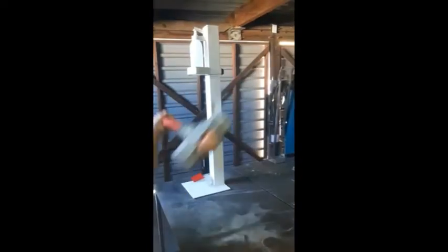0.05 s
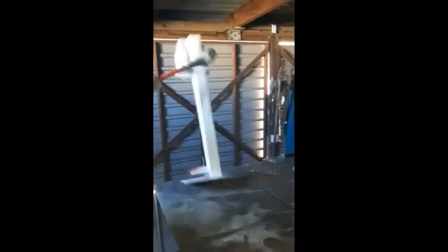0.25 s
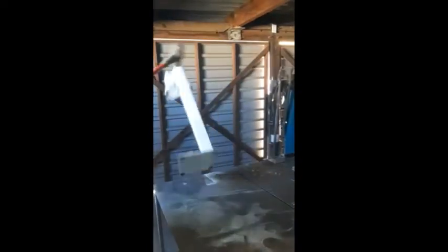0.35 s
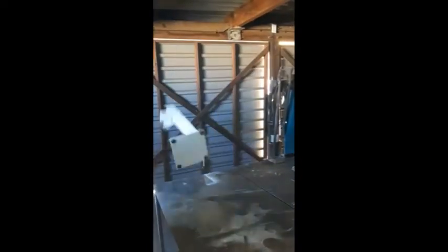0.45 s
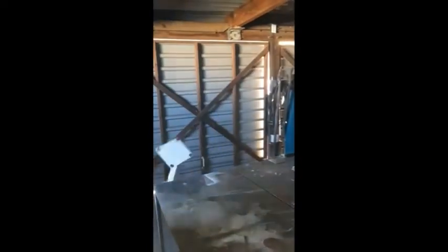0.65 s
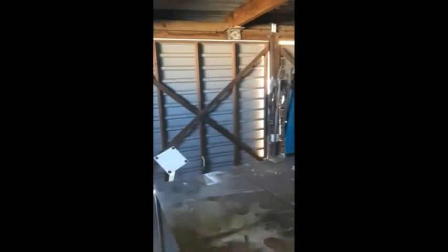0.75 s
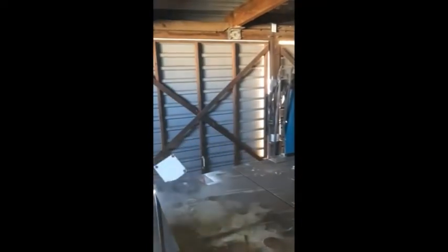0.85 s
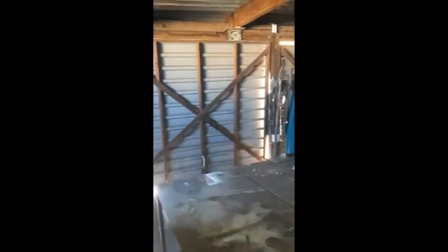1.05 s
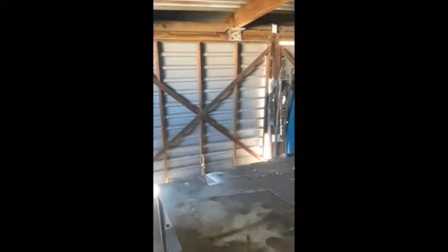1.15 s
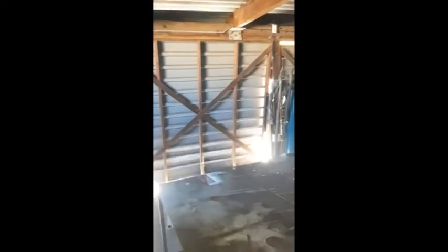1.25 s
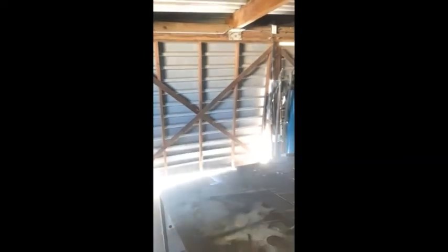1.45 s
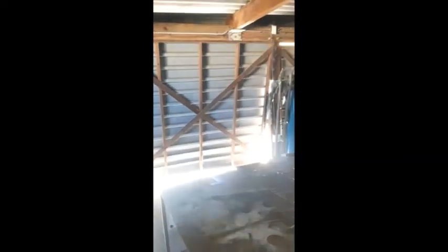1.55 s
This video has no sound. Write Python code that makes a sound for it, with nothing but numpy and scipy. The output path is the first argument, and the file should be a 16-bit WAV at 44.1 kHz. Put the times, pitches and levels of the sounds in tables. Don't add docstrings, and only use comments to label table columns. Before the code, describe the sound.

A steel stand takes a sharp sledgehammer hit after a brief swish, rattles and rings, then slams down, bounces, skids and crashes again with clattering, close and flattened by the microphone in a bright, reverberant sheet-metal shed.

```python
import sys
import numpy as np
from scipy import signal
from scipy.fft import rfft, irfft, next_fast_len
from scipy.io import wavfile
from scipy.ndimage import uniform_filter1d, minimum_filter1d

SR = 44100
rng = np.random.default_rng(int(sys.argv[2]) if len(sys.argv) > 2 else 0)


def natural_amplitude(level_db):
    exponent = np.asarray(level_db, float) / 20
    return 10 ** exponent


def store_wav(level_fs):
    pcm = np.round(np.clip(np.atleast_2d(level_fs), -1, 1) * 32767)
    wavfile.write(sys.argv[1], SR, pcm.T.astype(np.int16))


N = 70560


def at_hz(points, hz):
    table_hz, values = np.transpose(points)
    return np.interp(np.log(np.maximum(hz, 1)), np.log(table_hz), values)


def in_time(rows):
    return natural_amplitude(np.interp(np.arange(N) / SR, *np.transpose(rows)))


def shaped(x, gain_db):
    size = next_fast_len(N + 4096)
    gain = natural_amplitude(gain_db(np.fft.rfftfreq(size, 1 / SR)))
    return irfft(rfft(x, size) * gain, size)[..., :N]


def rms_one(x):
    return x / np.sqrt(np.mean(x ** 2) + 1e-20)


def low_cut(x, hz):
    return signal.sosfilt(signal.butter(2, hz, "high", fs=SR, output="sos"), x)


def later(x, lag_s):
    return np.interp(np.arange(N) - lag_s * SR, np.arange(N), x)


# (time [s], level [dB])
STIR_LEVEL = [
    (0, -36.5),
    (.04, -38),
    (.075, -41.5),
    (.6, -39),
    (1.6, -57.5),
]
# (frequency [Hz], level [dB])
AIR_COLOUR = [(40, 12), (150, -9.5), (500, -8.5), (1000, -10.5), (3000, -14), (6000, -15.5), (9000, -11.5),
              (15000, -25.5)]


def air():
    noise = shaped(rng.standard_normal((2, N)), lambda hz: at_hz(AIR_COLOUR, hz))
    return in_time(STIR_LEVEL) * rms_one(noise)


# (time [s], level [dB])
SWING_LEVEL = [
    (.082, -62),
    (.0895, -34.5),
    (.13, -30.5),
    (.165, -40.5),
    (.198, -34),
    (.21, -77),
]
# (time [s], level [dB])
WHISTLE_LEVEL = [
    (.085, -73),
    (.0885, -43),
    (.11, -42.5),
    (.125, -55),
    (.14, -79),
]


def swish():
    hiss_hz, hiss_width_hz, skirt_db = 5600, 1600, -2
    whistle_hz, whistle_width_hz = 4670, 190

    def hiss_colour(hz):
        band = np.exp(-((hz - hiss_hz) / hiss_width_hz) ** 2)
        skirt = natural_amplitude(2 * skirt_db) * np.minimum(hz / hiss_hz, 1)
        return 10 * np.log10(band + skirt)

    def whistle_colour(hz):
        return -9 * np.minimum(((hz - whistle_hz) / whistle_width_hz) ** 2, 9)

    whistle = rms_one(shaped(rng.standard_normal(N), whistle_colour))
    hiss = rms_one(shaped(rng.standard_normal((2, N)), hiss_colour))
    return in_time(WHISTLE_LEVEL) * whistle + in_time(SWING_LEVEL) * hiss


def ring(strikes, hz, t60):
    r, w = natural_amplitude(-60 / (t60 * SR)), 2 * np.pi * hz / SR
    return signal.lfilter([0, np.sin(w)], [1, -2 * r * np.cos(w), r * r], strikes)


# (time [s], frequency [Hz], level [dB], t60 [s])
PING_NOTES = [(.09, 4650, -42, .12), (.222, 1990, -4, .2), (.295, 1257, -12.5, .12), (.38, 1400, -13, 0.11),
              (.53, 522, -33.5, 0.36), (0.599, 1440, -43.5, 0.57), (.703, 633, -6, 0.094),
              (.722, 1398, -13, 0.12), (.745, 2030, -14, 0.12), (.755, 1770, -18, 0.073),
              (0.939, 513, -32, 0.14), (.98, 1034, -26.5, 0.18), (1.105, 1340, -10, 0.13),
              (1.13, 770, -23, 0.068), (1.14, 1500, -8, 0.103), (1.142, 1020, -19, 0.092),
              (1.14, 2180, -16, 0.26), (1.233, 936, -20, 0.066), (1.237, 1460, -19.5, 0.14),
              (1.262, 686, -18, .09), (1.287, 1242, -18, 0.22), (1.33, 724, -22.5, 0.08),
              (1.386, 1238, -24.5, 0.13)]


def pings():
    out = 0
    for s, hz, db, t60 in PING_NOTES:
        click = natural_amplitude(db) * (np.arange(N) == int(s * SR))
        out = out + ring(click + 1e-18, hz, t60)
    return out


def touches():
    per_s, spread_db = 4000, 7
    sizes = natural_amplitude(spread_db * np.minimum(rng.exponential(1, N), 4)) * rng.choice([-1, 1], N)
    return rms_one(sizes * (rng.random(N) < per_s / SR))


def chatter(s, level_db, cut_hz, t60, clicks, order=2):
    t = np.arange(N) / SR - s
    burst = clicks * (t >= 0) * natural_amplitude(level_db - 60 * np.maximum(t, 0) / t60)
    first_touch_db = level_db + 17
    burst[int(s * SR) + 1] = natural_amplitude(first_touch_db) * (order == 2)
    softness = signal.butter(order, cut_hz, fs=SR, output="sos")
    return signal.sosfilt(softness, burst + 1e-18) * np.sqrt(SR / 2 / cut_hz)


def steel(contacts, modes):
    low_cut_hz, light_touch_hz_per_db = 380, 41.5
    ring_db, strike_spread_db = -11.5, 2
    chatter_share = 0.2 * natural_amplitude(-24.5)
    clicks = touches()
    luck = rng.normal(0, 1, (len(contacts), len(modes)))
    clatter = 0
    for s, db, hz, t60, _ in contacts:
        body_hz = low_cut_hz + light_touch_hz_per_db * max(contacts[0][1] - db, 0)
        clatter = clatter + low_cut(chatter(s, db, hz, t60, clicks), body_hz)
    when = [int(c[0] * SR) for c in contacts]
    strike_db = np.array([c[1] + c[4] for c in contacts])
    rings = 0
    for k, (hz, mode_db, t60) in enumerate(modes):
        blows = np.bincount(when, natural_amplitude(strike_db + strike_spread_db * luck[:, k]), N)
        rings = rings + natural_amplitude(ring_db + mode_db) * ring(blows + chatter_share * clatter, hz, t60)
    return np.array([clatter, rings])


# (time [s], level [dB], contact cut-off [Hz], chatter t60 [s], ring [dB])
BLOW_CONTACTS = [
    (.2028, 8.5, 13400, 0.051, -22),
    (.225, 5.5, 9500, 0.037, -6),
    (.285, -23.5, 5000, 0.043, 16),
    (.34, -2.5, 7200, 0.017, -10),
    (.385, -8, 7000, 0.025, 2),
    (.43, -12.5, 8400, 0.12, 6),
    (.1985, -17, 2900, 0.011, 3),
    (.31, -17, 5000, .03, 7),
]
# (frequency [Hz], level [dB], t60 [s])
STRUCK_MODES = [(362, -11, 0.63), (522, -15.5, 0.58), (708, -14, 0.5), (1830, -5, 0.084), (1268, -4.5, 0.3),
                (1340, 4.5, 0.2), (1408, -3, 0.36), (1443, -5, 0.66), (2117, 8, .12), (2330, -7, 0.1),
                (2900, -21, 0.12), (4670, 0, 0.11), (5655, 0, 0.14)]


def blow():
    return steel(BLOW_CONTACTS, STRUCK_MODES)


# (frequency [Hz], t60 [s])
SHED_DECAY = [(50, 0.12), (100, 0.055), (250, 0.54), (700, 0.44), (1500, 0.54), (4000, 0.44), (7000, 0.51),
              (14000, 0.31)]
# (frequency [Hz], likeness [-1 to 1])
SHED_ALIKE = [(60, -0.075), (250, 0.64), (600, 0.12), (2000, 0.081), (12000, -0.033)]
# (frequency [Hz], level [dB])
WALL_DRONE = [(40, -40), (80, -16.5), (150, -10.5), (300, -10), (600, -10), (1200, -51), (3000, -61)]


def fading(power, t60):
    r = natural_amplitude(-120 / (t60 * SR))
    return signal.lfilter([1 - r], [1, -r], power)


def shed(x):
    shed_db, drone_t60_s = 7.5, 1.74
    edges = 30 * 2 ** np.arange(0, 9.5, 1 / 3)
    white = rng.standard_normal((2, 2, N))
    out = 0
    for k, (low, high) in enumerate(zip(edges, edges[1:])):
        band = signal.butter(2, [low, high], "band", fs=SR, output="sos")
        hz = np.sqrt(low * high)
        mid, side = rms_one(signal.sosfilt(band, white[k % 2]))
        alike = np.clip(at_hz(SHED_ALIKE, hz), -1, 1)
        power = signal.sosfilt(band, x + 1e-18) ** 2
        tail = fading(power, at_hz(SHED_DECAY, hz))
        drone = natural_amplitude(2 * at_hz(WALL_DRONE, hz)) * fading(power, drone_t60_s)
        stereo = np.sqrt(1 + alike) * mid + np.sqrt(1 - alike) * side * [[1], [-1]]
        out = out + np.sqrt((tail + drone) / 2) * stereo
    return natural_amplitude(shed_db) * out


def heard(clatter, rings):
    left = later(clatter, 0.000324) + later(rings, 0.00021)
    ring_room_db = -17
    return np.array([left, clatter + rings]) + shed(clatter + natural_amplitude(ring_room_db) * rings)


# (time [s], level [dB], cut-off [Hz], chatter t60 [s])
THUD_KNOCKS = [(0.205, -2, 165, 0.1), (0.261, -6, 155, 0.048), (.29, -15, 324, 0.038),
               (0.7, -1, 346, 0.035), (0.764, -13, 250, 0.048), (.979, -11, 317, 0.072),
               (1.11, -7.5, 890, 0.027), (1.26, -15.5, 830, 0.034), (1.33, -25, 770, 0.06),
               (1.471, -22.5, 710, 0.037), (1.585, -31, 513, 0.07), (.47, -23, 114, .06),
               (1.085, -12, 120, .05), (1.229, -31, 200, 0.029), (1.41, -22, 90, 0.061),
               (1.34, -29, 100, 0.084), (.74, -16, 90.4, 0.073)]


def thuds(clicks):
    return sum(chatter(*row, clicks, order=3) for row in THUD_KNOCKS)


# (time [s], level [dB], contact cut-off [Hz], chatter t60 [s], ring [dB])
LANDING_CONTACTS = [
    (.7015, -1, 11100, 0.086, 8),
    (.752, -16, 8300, 0.055, -16),
    (.79, -9.5, 6800, 0.066, -6),
    (.85, -20, 6500, 0.07, 24),
    (.905, -24, 8300, 0.04, -10.5),
    (.99, -33.5, 11500, 0.19, 0.5),
    (1.03, -33.5, 11100, 0.33, 14),
    (1.06, -37.5, 11900, 0.15, 29.5),
    (.6975, -22, 2500, 0.011, 2),
]
# (frequency [Hz], level [dB], t60 [s])
BASE_MODES = [(1230, -41, 0.28), (1300, -16.5, 0.58), (1990, -4, 0.11), (2030, -24, .1), (2170, -13, .1),
              (2900, -19, 0.033), (5640, -28, 0.12)]


def landing():
    return steel(LANDING_CONTACTS, BASE_MODES)


# (time [s], level [dB], contact cut-off [Hz], chatter t60 [s], ring [dB])
SLAP_CONTACTS = [
    (.706, -3.5, 2030, 0.015, 2),
    (.772, -30, 1970, 0.018, 23),
    (.79, -33.5, 2020, .02, 31.5),
    (.91, -38.5, 2030, .02, 28),
]
# (frequency [Hz], level [dB], t60 [s])
SLAP_MODES = [(374, -15.5, 0.75), (600, -13, 0.039), (669, -2, 0.28)]


def plate_slap():
    return steel(SLAP_CONTACTS, SLAP_MODES)


# (time [s], level [dB], cut-off [Hz])
SKID_PATH = [
    (.982, -23, 350),
    (1.004, -15.5, 624),
    (1.028, -23, 910),
    (1.055, -21, 1420),
    (1.085, -28, 2000),
]


def skid(clicks):
    step_t60_s, span = 0.027, 3.2
    s, level_db, cut_hz = np.transpose(SKID_PATH)
    out = 0
    for t in np.linspace(s[0], s[-1], num=16):
        db, hz = np.interp(t, s, level_db), np.interp(t, s, cut_hz)
        out = out + low_cut(chatter(t, db, hz, step_t60_s, clicks, order=3), hz / span)
    return out


# (time [s], level [dB], contact cut-off [Hz], chatter t60 [s], ring [dB])
CRASH_CONTACTS = [(1.088, -18.5, 10000, 0.11, 2.6), (1.097, -11.5, 11600, 0.15, 2.7),
                  (1.107, -13.5, 7060, 0.0096, 9.1), (1.114, -21, 7000, 0.051, 15.4),
                  (1.128, -15, 8000, 0.046, 11.5), (1.15, -13, 8000, 0.06, 8.6),
                  (1.164, -13.5, 7000, 0.044, 10.6), (1.181, -20, 6200, 0.037, 8.8),
                  (1.202, -22.5, 6000, 0.018, 12), (1.219, -25, 5000, 0.015, 14),
                  (1.238, -23.5, 4000, 0.016, 13), (1.262, -31, 4040, 0.18, 2.8),
                  (1.291, -30, 2980, 0.04, 16.6), (1.346, -39.5, 2500, 0.033, 14),
                  (1.384, -36, 2500, 0.043, 13.8), (1.446, -42, 2500, 0.047, 7.3)]
# (frequency [Hz], level [dB], t60 [s])
DOWN_MODES = [(522, -18, 0.23), (711, -8, 0.33), (856, -1.5, 0.066), (980, -4.5, 0.32), (986, 5.5, 0.024),
              (1258, 0.5, 0.46), (1285, -5, 0.3), (1354, 3, 0.17), (1460, 1.5, 0.096), (1405.3, 0, 0.46),
              (1557, 1, 0.13), (1695, -13, 0.2), (2180, 1.5, 0.085)]


def crash():
    return steel(CRASH_CONTACTS, DOWN_MODES)


def scene():
    clatter, rings = blow() + landing() + plate_slap() + crash()
    board_clicks = touches()
    boards = thuds(board_clicks) + skid(board_clicks)
    return heard(clatter + boards, rings) + pings() + swish() + air()


def treble_dropouts(x):
    patch_from_hz, patch_to_hz, patch_share, patch_db = 7700, 10200, .27, -24
    patch_bins, patch_frames = 3, 12
    gap_s, gap_length_s, gap_from_hz, gap_db = .689, .008, 2600, -18
    hz, s, cells = signal.stft(x, SR, nperseg=256)
    lost = rng.random((len(hz) // patch_bins + 1, len(s) // patch_frames + 1)) < patch_share
    lost = lost.repeat(patch_bins, axis=0).repeat(patch_frames, axis=1)[:len(hz), :len(s)]
    patches = patch_db * lost * ((hz > patch_from_hz) & (hz < patch_to_hz))[:, None]
    gap = gap_db * np.outer(hz > gap_from_hz, (s > gap_s) & (s < gap_s + gap_length_s))
    return signal.istft(cells * natural_amplitude(patches + gap), SR, nperseg=256)[1][:, :N]


def limited(x):
    limit_db, release_db_per_s, sense_s, look_ahead_s = -7, 243, 0.0054, 0.014
    power = uniform_filter1d(np.mean(x ** 2, axis=0), size=int(sense_s * SR))
    over_db = 10 * np.log10(power + 1e-12) - limit_db
    fall = release_db_per_s * np.arange(N) / SR
    held = np.maximum(np.maximum.accumulate(over_db + fall) - fall, 0)
    ahead = int(look_ahead_s * SR)
    held = uniform_filter1d(-minimum_filter1d(-held, size=2 * ahead + 1), size=ahead)
    return x * natural_amplitude(-held)


def top_cut(x):
    return signal.sosfilt(signal.butter(12, 15900, fs=SR, output="sos"), x)


# (frequency [Hz], level [dB])
MIC_COLOUR = [(30, -38), (100, -16), (400, -6), (1500, 0), (5500, 0.5), (7000, -1.5), (9500, -11),
              (13000, -5)]


def record(dry):
    def colour(hz):
        dip = -9 * np.exp(-((hz - 7990) / 1240) ** 2)
        notch = -20 * np.exp(-((hz - 8000) / 59) ** 2)
        return at_hz(MIC_COLOUR, hz) + dip + notch

    x = treble_dropouts(limited(shaped(dry, colour)))
    top = .95
    return top_cut(top * np.tanh(x / top))


dry = scene()
out = record(dry)
store_wav(out)
```